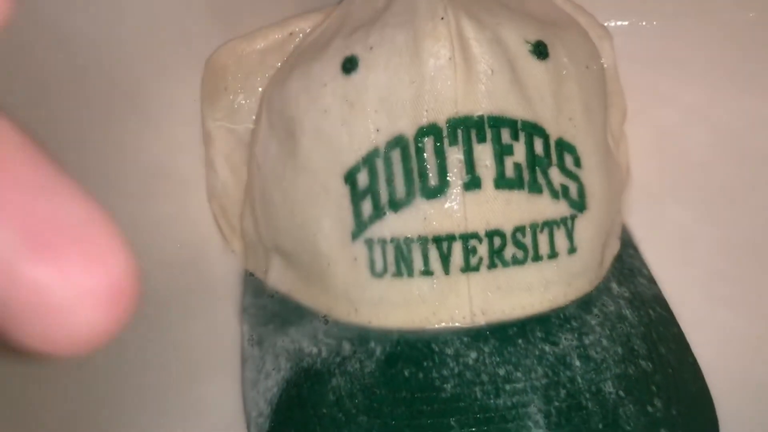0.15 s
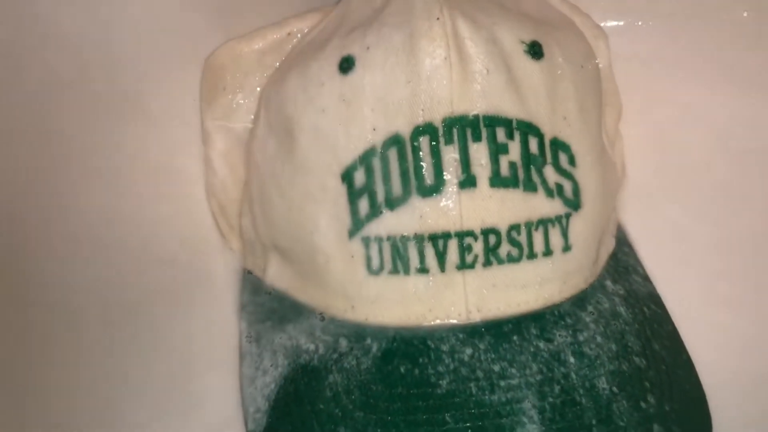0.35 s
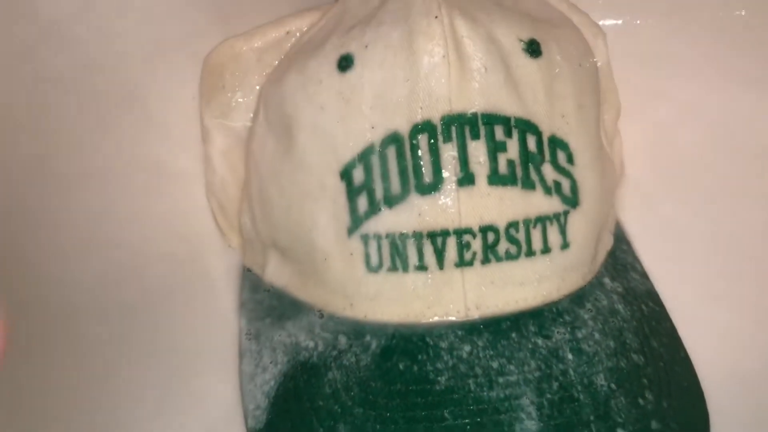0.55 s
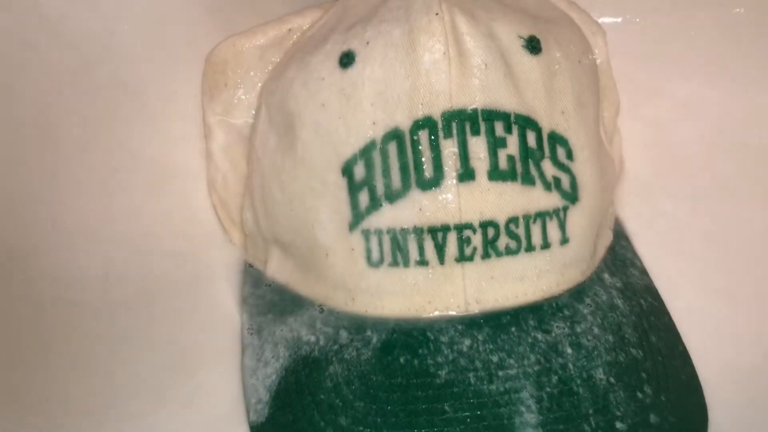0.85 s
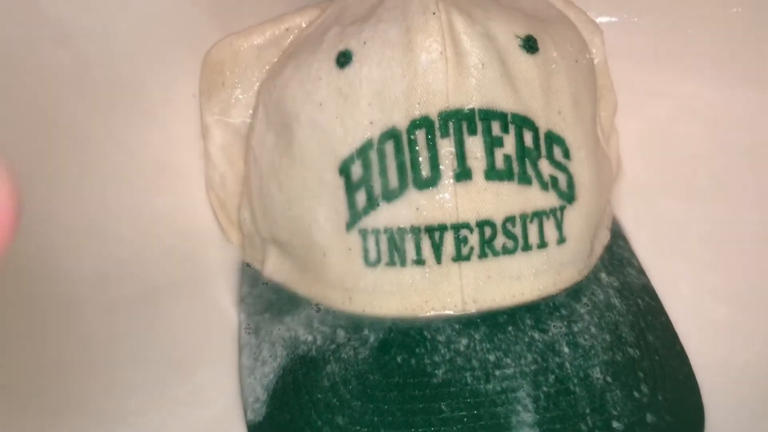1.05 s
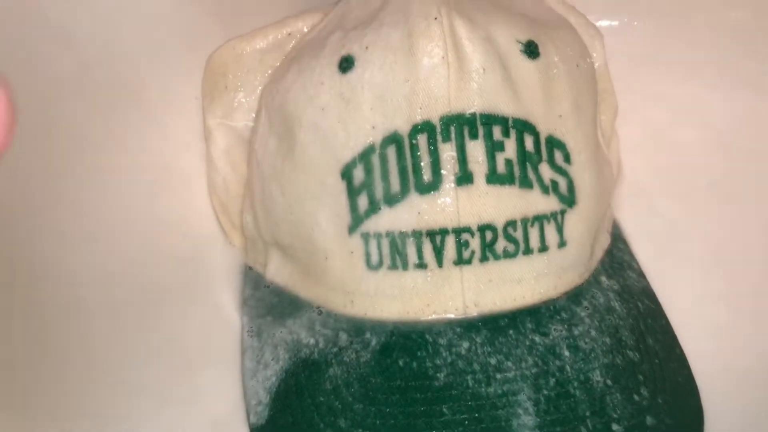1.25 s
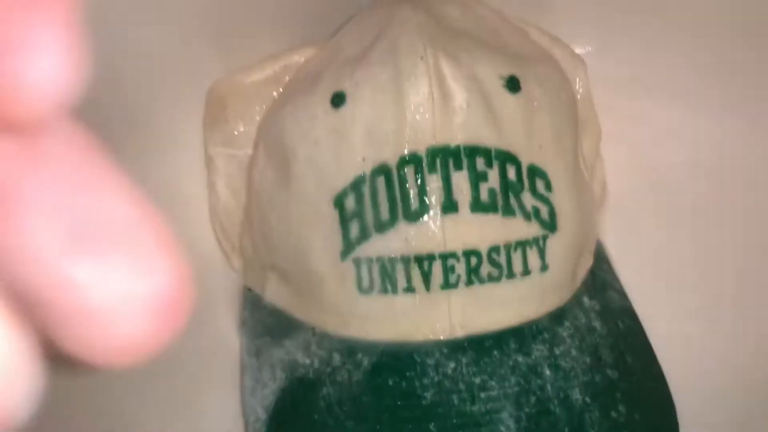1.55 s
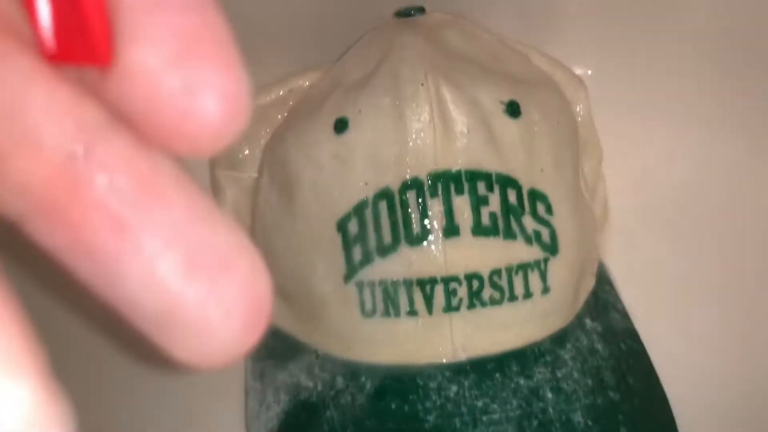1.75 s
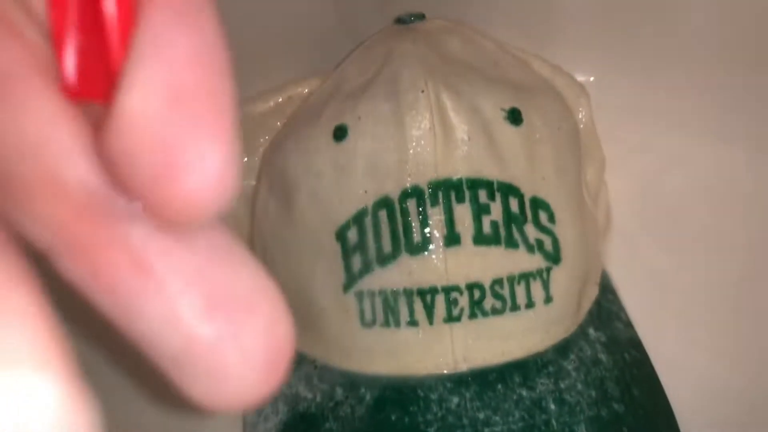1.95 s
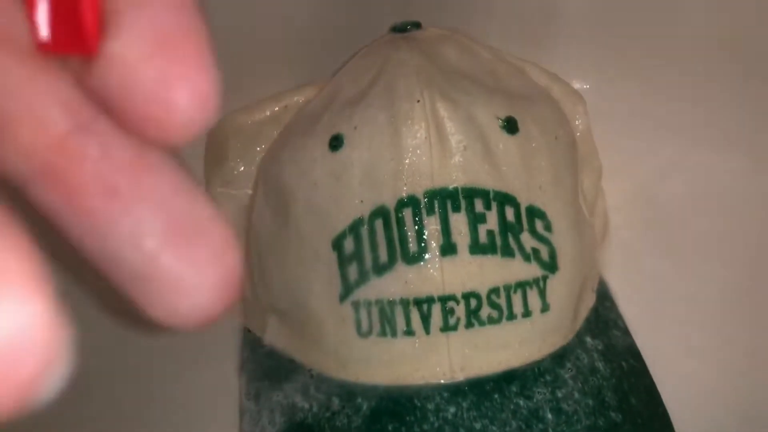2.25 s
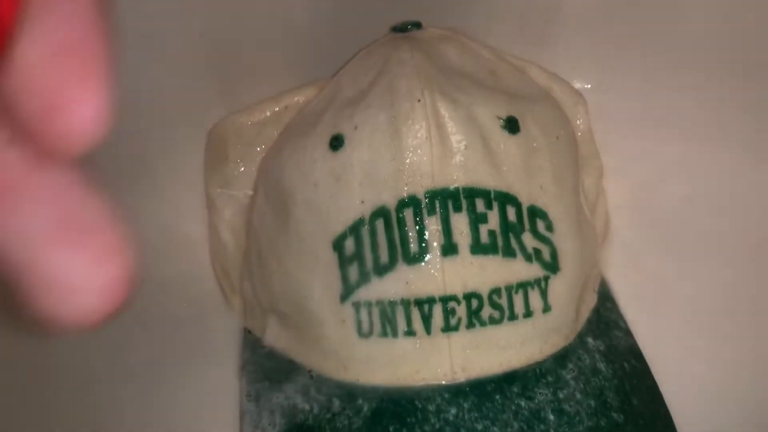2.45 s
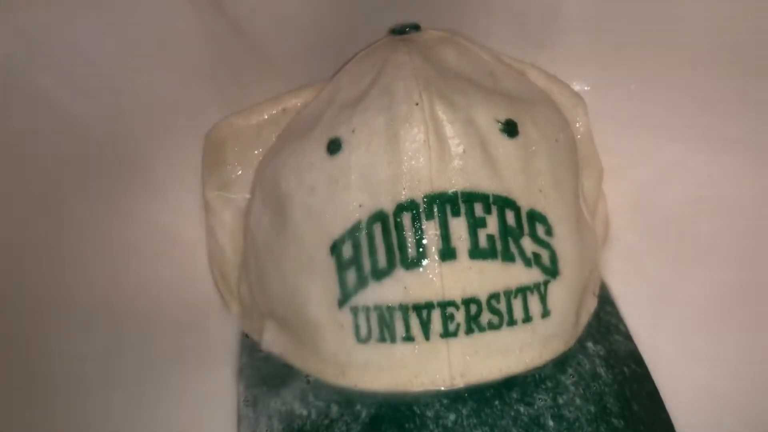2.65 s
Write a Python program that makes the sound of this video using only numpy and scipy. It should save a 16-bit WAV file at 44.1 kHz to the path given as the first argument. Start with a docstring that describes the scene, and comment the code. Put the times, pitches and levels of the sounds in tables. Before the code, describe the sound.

Close to the microphone in a small room, a spray bottle snaps loudly and bumps set a sink booming. Four bright, evenly spaced squirts follow, pattering onto soaked cloth, with the trigger chirping back after each.

```python
"""Hard plastic snaps loudly and dull bumps set a sink booming. Then a trigger spray bottle squirts four
times onto a wet cloth cap in the basin, close to the microphone. Each squirt is a bright nozzle hiss,
mist pattering on the cloth with hollow plops from the heavy drops, a few spits as the pressure runs out,
and the stick-slip chirp of the trigger springing back. Underneath are hand knocks, small ticks, valve
fizzes, thin squeals and one short creak; a small room adds a short tail and a faint low hush."""
import sys
import numpy as np
from scipy import signal
from scipy.fft import rfft, irfft
from scipy.io import wavfile
from scipy.ndimage import uniform_filter1d

SR = 44100
rng = np.random.default_rng(int(sys.argv[2]) if len(sys.argv) > 2 else 0)


def wav_out(sig):
    """Save sig, one row per channel (or a flat mono array), as 16-bit PCM at SR to the path in sys.argv[1]."""
    wavfile.write(sys.argv[1], SR, np.round(np.clip(np.atleast_2d(sig).T, -1, 1) * 32767).astype(np.int16))


N = 123479

# The squirts. Each row: start in seconds, hiss level in dB, hiss hold in seconds, mist flight in seconds,
# patter level in dB, patter hold in seconds, cloth drumming level in dB.
TRIGGER_PULLS = [(0.711, -26.5, 0.096, 0.026, -38.5, 0.087, -50),
                 (1.295, -25.5, 0.062, 0.027, -38, 0.081, -48), (1.887, -24, 0.076, .031, -42, 0.087, -51),
                 (2.472, -24.5, 0.069, .024, -37, 0.099, -47.5)]

# Short noises. Each row: start in seconds, length in seconds, level in dB.
AIR_LEAKS = [(1.288, 0.016, -60), (1.881, .012, -64), (2.455, 0.015, -60)]  # from the nozzle, ahead of the jet
NOZZLE_DRIBBLES = [(1.404, 0.038, -49), (2.036, .022, -52), (2.592, 0.031, -46)]  # as the pressure runs out
CLOTH_SPLASHES = [(0.782, .035, -44), (1.381, 0.05, -42.5), (1.965, 0.037, -49), (2.592, 0.014, -50)]  # coarse drops on soaked cloth
PLASTIC_SLIDES = [(0.187, 0.05, -51.5), (0.412, 0.018, -51)]  # just before the plastic hits
VALVE_FIZZES = [(0.403, 0.051, -62.5), (0.463, 0.015, -47)]  # air sucked through the wet valve

# Single hits. Each row: start in seconds, level in dB.
NOZZLE_SPITS = [(0.719, -39), (1.304, -45), (1.43, -37.5), (1.435, -39), (1.448, -38.5), (1.894, -38),
                (2.033, -41), (2.0381, -33.5), (2.0587, -44.5), (2.477, -44), (2.484, -40), (2.499, -28),
                (2.597, -28), (2.607, -40), (2.624, -39), (2.638, -46)]
TRIGGER_RETURNS = [(0.9489, -33.5), (1.5323, -33), (2.1168, -33), (2.7111, -32)]
SHARP_TICKS = [(0.1105, -51), (0.1126, -44.5), (0.4433, -52.5), (.493, -60.5), (.503, -66), (.52, -71),
               (0.6207, -60.5), (0.683, -61.5), (1.195, -52.5), (1.644, -66), (1.768, -54), (2.307, -58)]
SNAP_CONTACTS = [(0.2272, -42), (0.2298, -27.5), (0.2312, -22), (0.2322, -17.5), (0.2352, -35)]

# Heavy drops on the cap. Each row: start in seconds, pitch in Hz, level in dB.
CAP_PLOPS = [(.741, 476.5, -39.5), (1.329, 486, -37.5), (1.403, 690, -41.5), (1.415, 467, -31.5),
             (1.923, 507, -30.5), (1.98, 435, -37.5), (2.008, 400, -37.5), (2.067, 470, -36.5),
             (2.078, 351, -42), (2.501, 289, -25), (2.503, 637, -30.5), (2.518, 437, -25),
             (2.538, 518, -29.5), (2.594, 473.5, -21.5), (2.651, 369, -34), (2.662, 458, -33)]
# Stick-slip steps of one trigger return. Each row: delay in seconds, trim in dB, treble cutoff in Hz.
TRIGGER_SLIPS = [(0, -9.5, 7000), (.0042, -6.5, 14700), (.0085, -13, 12000)]
# The hand on the bottle. Each row: start in seconds, click level in dB, body level in dB.
HAND_KNOCKS = [(0.1893, -57, -52.5), (.115, -56, -44.5), (0.583, -57, -51), (0.621, -61, -50),
               (0.9364, -50, -53), (1.193, -59, -46.5), (1.5119, -40, -64), (1.616, -47, -45),
               (1.767, -60, -46.5), (2.186, -69, -48.5), (2.215, -61, -50.5), (2.317, -62, -52.5),
               (2.351, -59, -57.5), (2.597, -42.5, -51), (2.6506, -42.5, -56.5), (2.796, -48, -43.5)]
# Bumps on the basin. Each row: start in seconds, contact level in dB, boom level in dB.
BASIN_BUMPS = [(0.235, -29.5, -26), (.261, -38, -26), (0.4334, -40, -30.5), (.444, -43, -29),
               (0.4661, -42.5, -30.5), (0.492, -43.5, -35.5), (.52, -48.5, -36.5), (.792, -48, -34.5),
               (0.813, -71, -37.5), (.85, -58, -39.5), (0.881, -50.5, -46), (0.9, -50.5, -46.5),
               (0.9972, -42, -32), (1.034, -47.5, -36), (1.078, -51.5, -41), (1.103, -56.5, -43.5)]
# Thin squeals and one short creak just before the first squirt.
# Each row: start in seconds, length in seconds, top pitch in Hz, width in Hz, level in dB.
SQUEALS_AND_CREAK = [(0.578, 0.061, 4380, 40, -75), (0.706, .024, 3190, 452, -53),
                     (1.061, 0.26, 4600, 25, -77.5)]

# Ringing bodies. Each row: pitch in Hz, relative level in dB, seconds to fall 60 dB.
CLOTH_MODES = [(287, -5.5, 0.19), (351, -16, 0.17), (428.5, 2, 0.22), (501, -5.5, 0.053), (547, -5, 0.072),
               (643, 4.5, 0.051)]
PLASTIC_MODES = [(127, -25, 0.17), (155.6, -21.5, .22), (308, -33.5, .12), (351, -28.5, 0.084),
                 (468, -18, .09), (530, -22, .08), (753, -14, .04), (890, -19, 0.076), (1010, -8.5, .03),
                 (1246, -13.5, .03), (1770, -18.5, 0.022), (2570, -25, 0.036), (3150, -20, .022),
                 (3500, -20.5, 0.017), (4215, -21, 0.0073), (4650, -23, 0.015)]
BASIN_MODES = [(70, -5.5, .4), (97, -1.5, 0.1), (121, -7, 0.11), (154.4, -4, .42), (214, -7.5, .28),
               (299.7, -8.5, .32), (366, -20, .25), (436, -17, 0.36), (584, -17.5, 0.15)]
# The room's tail. Each row: frequency in Hz, seconds to fall 60 dB.
ROOM_DECAY = [(100, 0.24), (500, 0.2), (2500, 0.14), (8000, 0.11)]

# EQ curves that give each noise its tone. Each row: frequency in Hz, relative gain in dB.
HISS_EQ = [(500, -21), (2000, -18), (5000, -17), (8000, -14), (10500, -16.5), (12500, -3), (14200, -42),
           (15500, -8), (16500, 4)]
SPIT_EQ = [(500, -44), (3000, -18), (7000, -20), (10000, -7), (13000, -1.5), (16000, 2)]
PATTER_EQ = [(70, -54.5), (180, -9), (350, 6.5), (700, 5), (900, -3.5), (1150, 5.5), (1450, -2.5),
             (1780, 3.5), (2200, -13), (2570, 2), (3300, -4), (5000, -6), (8000, -9), (16000, -5)]
MIST_EQ = [(1000, -44), (4000, -34), (7000, -0.5), (12000, 9), (16000, 2.5)]
SPLASH_EQ = [(300, -15), (600, -8), (1300, -1), (2200, -8), (3300, 8), (4300, 1), (6000, -9), (16000, -41)]
TRIGGER_EQ = [(300, -14), (1000, -9), (1800, -3), (2250, -10.5), (2940, 6), (4000, -6), (5050, 2.5),
              (6500, -5.5), (9800, -11.5), (16000, -7.5)]
CRACK_EQ = [(200, -14.5), (1200, 2), (2200, -7), (3300, 1), (4300, 0.5), (5500, -6), (9000, -10),
            (12000, -14), (16000, -10)]
SNAP_TAIL_EQ = [(100, -3.5), (190, 5), (600, 1), (2000, -5.5), (4500, -10.5), (8000, -17), (16000, -23.5)]
CONTACT_EQ = [(150, -4), (400, 7), (1100, 2.5), (1550, -7.5), (1950, 0), (2500, -17.5), (4500, -20),
              (8000, -33), (16000, -39.5)]
BOOM_EQ = [(25, -47), (45, -21.5), (68, 1.5), (110, 4.5), (160, -6.5), (240, -10.5), (500, -24),
           (1200, -36), (8000, -85)]
KNOCK_EQ = [(200, -14), (700, -4.5), (1150, 2), (1600, -6), (2100, -12), (2850, 0.5), (3700, -20),
            (7000, -24), (10000, -36.5), (16000, -43)]
BOTTLE_EQ = [(80, -21.5), (170, -1.5), (280, 1.5), (500, -2.5), (800, -10.5), (1300, -22), (3000, -34),
             (12000, -55.5)]
TICK_EQ = [(500, -24.5), (2000, -8.5), (3200, 6), (5000, -2), (6700, -3), (8000, -17.5), (16000, -22)]
SLIDE_EQ = [(150, -12), (600, 1), (1200, 1.5), (2200, -13.5), (5000, -20.5), (7200, -22.5), (10000, -24.5),
            (16000, -28.5)]
FIZZ_EQ = [(1000, -27), (5000, -15), (6500, -3), (7500, 2.5), (8600, -10), (12000, -11.5), (16000, -13)]
ROOM_TONE_EQ = [(15, -40), (70, -7.5), (160, -1), (280, -8.5), (450, -11.5), (750, -20), (1100, -19),
                (2100, -27), (3200, -26.5), (6000, -30), (13000, -36), (16000, -38)]


def nozzle(attack_s=.039, sag_db_per_s=176, stop_db_per_s=260):
    """Air leaks, then the sputtering hiss climbs, sags with the pressure and ends in dribbles and spits."""
    out, t = np.zeros(N), clock()
    attack = np.minimum(t / attack_s, 1)
    sag_db = sag_db_per_s * np.maximum(t - attack_s, 0)
    jet_hz = 14340 - 2840 * np.exp(-t / .007)  # the whistle scoops up as the jet starts
    for start, hiss_db, hold, *_ in TRIGGER_PULLS:
        pressure = attack ** .7 * amp(-sag_db - stop_db_per_s * np.maximum(t - hold, 0))
        hiss = attack * colour(noise(), HISS_EQ) + amp(-9) * whistle(jet_hz, width_hz=1270)
        add(out, start, amp(hiss_db) * pressure * sputter() * hiss)
    for start, length, db in AIR_LEAKS:
        add(out, start, amp(db) * np.sqrt(swell(length)) * whistle(12100, width_hz=1900))
    for start, length, db in NOZZLE_DRIBBLES:
        add(out, start, amp(db) * sputter() * colour(droplets() * (t < length), SPIT_EQ))
    for start, db in NOZZLE_SPITS:
        add(out, start, amp(db) * burst(SPIT_EQ, t60=.025))
    return out


def spray(attack_s=.014):
    """Mist lands just after the hiss, fine and then coarser, and drums on the cloth with a hollow ring."""
    out, t = np.zeros(N), clock()
    attack = np.minimum(t / attack_s, 1)
    for start, _, _, flight, patter_db, hold, cloth_db in TRIGGER_PULLS:
        release_s = np.maximum(t - hold, 0)
        coarse = colour(droplets(), PATTER_EQ)
        fine = amp(-2 - 130 * t) * colour(droplets(), MIST_EQ)
        patter = amp(patter_db - 260 * release_s) * (coarse + fine)
        cloth = irfft(rfft(droplets()) * rfft(ring(CLOTH_MODES)))  # every drop rings the cloth
        drum = amp(cloth_db - 132 * release_s) * unit_rms(low_cut(cloth, 265))
        hollow = amp(patter_db - 14 - 256 * release_s) * whistle(2538, width_hz=180)
        add(out, start + flight, attack * (patter + drum + hollow))
    for start, length, db in CLOTH_SPLASHES:
        add(out, start, amp(db) * colour(droplets() * swell(length), SPLASH_EQ))
    return out


def plops(attack_s=.002, t60=.055):
    """The hollow crown of the cap answers heavy drops with a short note."""
    out = np.zeros(N)
    attack = (1 - np.exp(-clock() / attack_s)) ** 2
    for start, hz, db in CAP_PLOPS:
        add(out, start, attack * ring([(hz, db, t60)]))
    return out


def trigger():
    """The trigger springs back, sticking and slipping in three quick steps that make a chirp."""
    out = np.zeros(N)
    for start, db in TRIGGER_RETURNS:
        for delay, trim_db, cutoff_hz in TRIGGER_SLIPS:
            slip = high_cut(burst(TRIGGER_EQ, t60=.022), cutoff_hz)
            add(out, start + delay, amp(db + trim_db) * slip)
    return out


def snap(ring_start_s=.2318):
    """Hard plastic cracks home; the hollow body rings and leaves a dense tail."""
    out = np.zeros(N)
    for start, db in SNAP_CONTACTS:
        add(out, start, amp(db) * burst(CRACK_EQ, t60=.01))
    add(out, ring_start_s, ring(PLASTIC_MODES) + amp(-37) * burst(SNAP_TAIL_EQ, t60=.34))
    return out


def basin(bloom_s=.01, rebound_s=.0072):
    """Each bump touches twice, leaves a hollow rattle and sets the basin booming."""
    out = np.zeros(N)
    modes = amp(-3.5) * hit_energy(ring(BASIN_MODES))
    bloom = np.minimum(clock() / bloom_s, 1)
    for start, contact_db, boom_db in BASIN_BUMPS:
        contact = burst(CONTACT_EQ, t60=.039)
        rattle = amp(-3) * burst(CONTACT_EQ, t60=.2)
        add(out, start, amp(contact_db) * (contact + rattle))
        add(out, start, amp(boom_db) * bloom * (burst(BOOM_EQ, t60=.25) + modes))
        add(out, start + rebound_s, amp(contact_db - 10) * burst(CONTACT_EQ, t60=.039))
    return out


def knocks():
    """The hand knocks on the bottle: a click over a low body thud."""
    out = np.zeros(N)
    for start, click_db, body_db in HAND_KNOCKS:
        add(out, start, amp(click_db) * burst(KNOCK_EQ, t60=.0083))
        add(out, start, amp(body_db) * burst(BOTTLE_EQ, t60=.18))
    return out


def ticks_and_slides():
    """Small sharp ticks, some crackling with the bumps on the basin, and brief slides of plastic."""
    out = np.zeros(N)
    for start, db in SHARP_TICKS:
        add(out, start, amp(db) * burst(TICK_EQ, t60=.0066))
    for start, length, db in PLASTIC_SLIDES:
        add(out, start, amp(db) * colour(noise() * (clock() < length), SLIDE_EQ))
    return out


def fizzes_and_squeals(bend_hz=380):
    """Air fizzes through the wet valve; thin squeals and one short creak bend up and down in pitch."""
    out = np.zeros(N)
    for start, length, db in VALVE_FIZZES:
        add(out, start, amp(db) * colour(droplets() * (clock() < length), FIZZ_EQ))
    for start, length, top_hz, width_hz, db in SQUEALS_AND_CREAK:
        arch = swell(length)
        tone = whistle(top_hz - bend_hz * (1 - arch), width_hz)
        add(out, start, amp(db) * np.sqrt(arch) * tone)
    return out


def reverb(x):
    """The small room's short tail, with the treble dying first."""
    hz, t, bands = signal.stft(noise(), SR, nperseg=256)
    decay = amp(-60 * t / curve_at(ROOM_DECAY, hz)[:, None])
    tail = signal.istft(bands * decay, SR, nperseg=256)[1]
    return signal.fftconvolve(x, tail / np.linalg.norm(tail))[:N]


def room_tone():
    """A steady low hush."""
    return colour(rng.standard_normal(N), ROOM_TONE_EQ)


def sputter(depth_db=2, grain_s=.0024):
    """The quick level flutter of a jet that carries bubbles."""
    flutter = unit_rms(uniform_filter1d(noise(), round(grain_s * SR)))
    return unit_rms(amp(depth_db * flutter))


def droplets(per_second=13000):
    """A dense train of tiny impacts, mostly soft with a few loud ones."""
    chance, size, sign = rng.random((3, len(clock())))
    impacts = (chance < per_second / SR) * np.sign(sign - .5)
    return unit_rms(impacts * amp(-7 * np.log(size + .026)))


def whistle(hz, width_hz):
    """A narrow band of noise around a steady or gliding pitch."""
    pole = np.exp(-np.pi * width_hz / SR)
    wander = signal.lfilter([1], np.poly([pole, pole]), noise() + 1j * noise())
    phase = 2 * np.pi * np.cumsum(np.broadcast_to(hz, wander.shape)) / SR
    return unit_rms((wander * np.exp(1j * phase)).real)


def burst(eq, t60):
    """One impact: noise that falls 60 dB in t60 seconds, shaped by an EQ curve."""
    fade = amp(-60 * clock() / t60)
    x = noise() * fade
    for _ in range(3):  # flatten chance peaks so that the EQ sets the tone
        spectrum = rfft(x)
        x = irfft(spectrum / (abs(spectrum) + 1e-12), len(x)) * np.minimum(2 * fade, 1)
    return hit_energy(colour(x, eq))


def ring(modes):
    """The dying sines of a struck body, neighbours in opposite polarity."""
    t = clock()
    return sum((-1) ** k * amp(db - 60 * t / t60) * np.sin(2 * np.pi * hz * t)
               for k, (hz, db, t60) in enumerate(modes))


def colour(x, eq, size=4096):
    """Minimum-phase EQ of unit energy, which keeps attacks sharp."""
    log_gain = np.log(amp(curve_at(eq, abs(np.fft.fftfreq(size, 1 / SR)))))
    response = np.exp(np.conj(signal.hilbert(log_gain)))
    taps = np.fft.ifft(response).real[:size // 2]
    return signal.oaconvolve(x, taps / np.linalg.norm(taps))[:len(x)]


def low_cut(x, hz):
    """Rolls off the bass at 24 dB an octave."""
    return signal.sosfilt(signal.butter(4, hz, "high", fs=SR, output="sos"), x)


def high_cut(x, hz):
    """Rolls off the treble steeply."""
    return signal.sosfilt(signal.butter(4, hz, fs=SR, output="sos"), x)


def curve_at(points, hz):
    """Reads a curve on a log-frequency axis."""
    point_hz, values = np.transpose(points)
    return np.interp(np.log(hz + 1), np.log(point_hz + 1), values)


def swell(length):
    """One arch from silence to 1 and back."""
    return np.sin(np.pi * np.minimum(clock() / length, 1)).clip(0)


def clock():
    """Half a second of sample times."""
    return np.arange(SR // 2) / SR


def noise():
    """Half a second of white noise."""
    return rng.standard_normal(SR // 2)


def amp(db):
    """Decibels to gain."""
    return 10 ** (np.asarray(db) / 20)


def unit_rms(x):
    """Scales to rms 1."""
    return x / np.sqrt(np.mean(x ** 2) + 1e-20)


def hit_energy(x):
    """Gives a hit the energy of 10 ms at rms 1."""
    return x * np.sqrt(.01 * SR / (np.sum(x ** 2) + 1e-20))


def add(mix, start, sound):
    """Drops a sound into the mix at a start time in seconds."""
    part = mix[round(start * SR):][:len(sound)]
    part += sound[:len(part)]


def scene():
    """The mono mix: close sources, a touch of reverb and faint room tone."""
    close = nozzle() + spray() + plops() + trigger()
    close += knocks() + ticks_and_slides() + fizzes_and_squeals() + snap() + basin()
    return (close + amp(-15) * reverb(close) + amp(-64.5) * room_tone())[None]


def record(dry):
    """The microphone chain: a 37 Hz low cut, a clip at full scale and a 15850 Hz band limit."""
    clipped = np.clip(low_cut(dry, 37), -1, 1)
    band_limit = signal.firwin(511, 15850, window=("kaiser", 9), fs=SR)
    return signal.oaconvolve(clipped, band_limit[None], "same")


dry = scene()
out = record(dry)
wav_out(out)
```